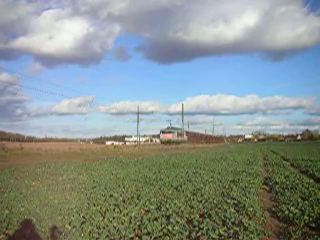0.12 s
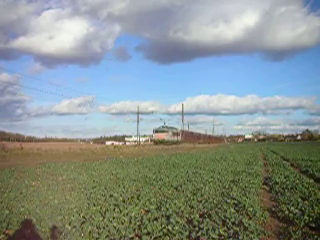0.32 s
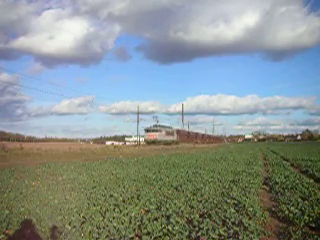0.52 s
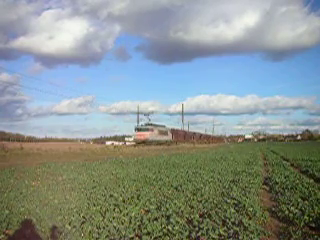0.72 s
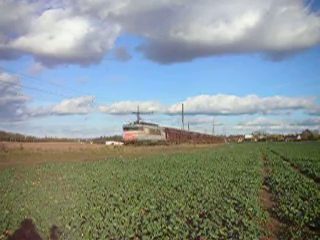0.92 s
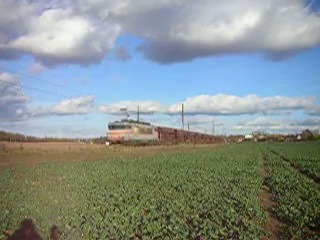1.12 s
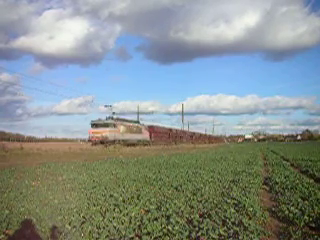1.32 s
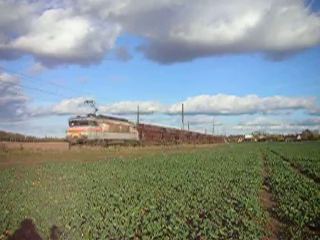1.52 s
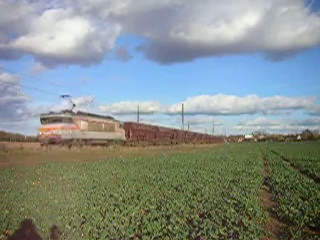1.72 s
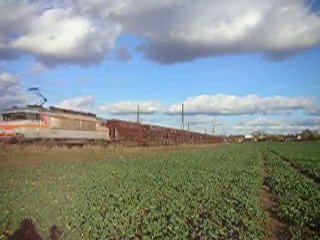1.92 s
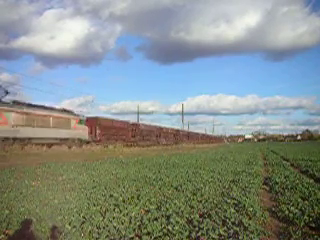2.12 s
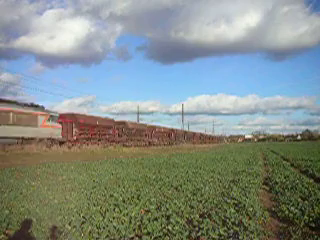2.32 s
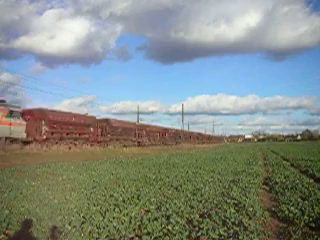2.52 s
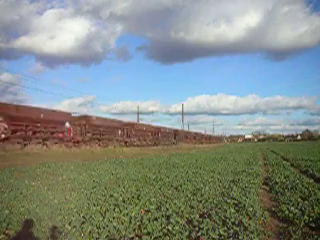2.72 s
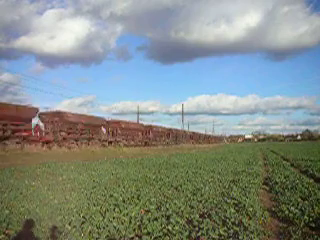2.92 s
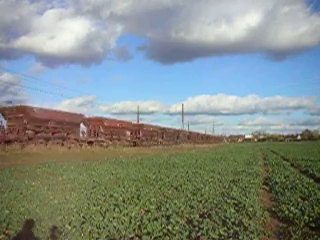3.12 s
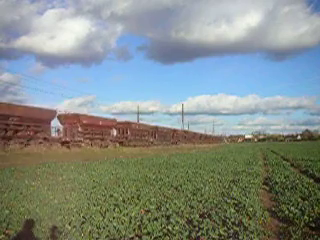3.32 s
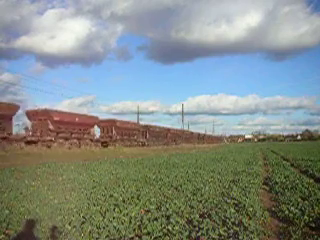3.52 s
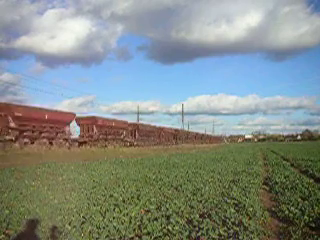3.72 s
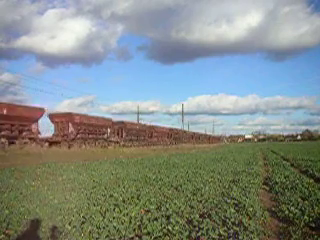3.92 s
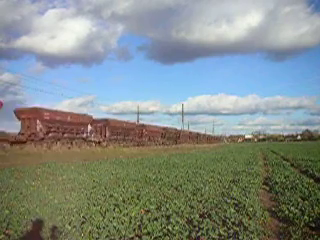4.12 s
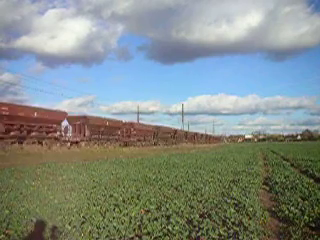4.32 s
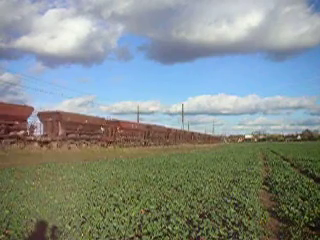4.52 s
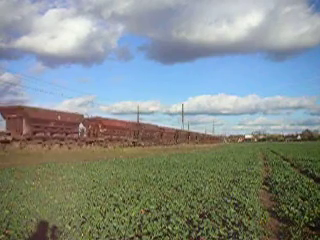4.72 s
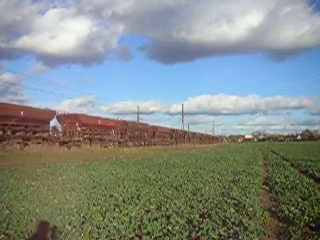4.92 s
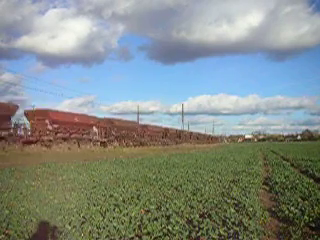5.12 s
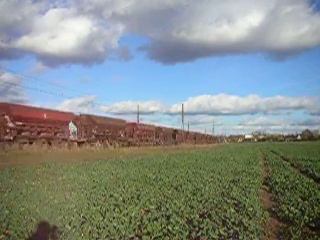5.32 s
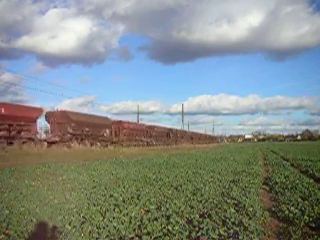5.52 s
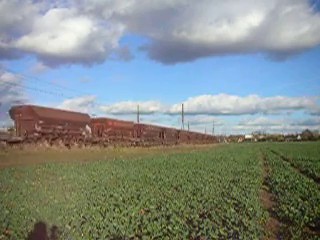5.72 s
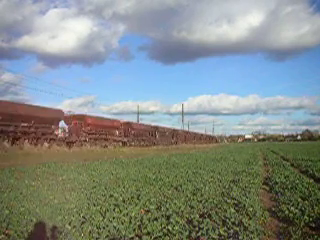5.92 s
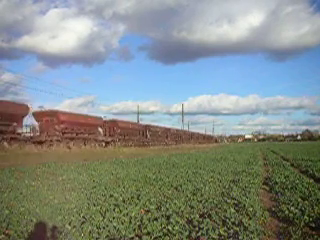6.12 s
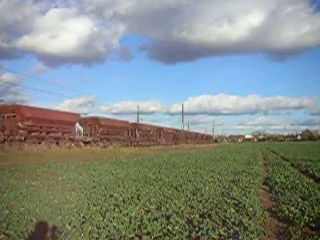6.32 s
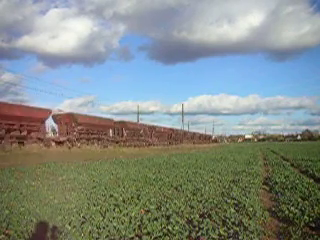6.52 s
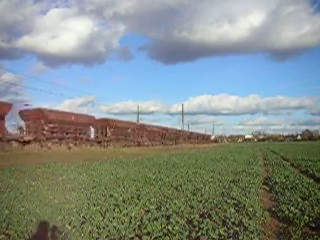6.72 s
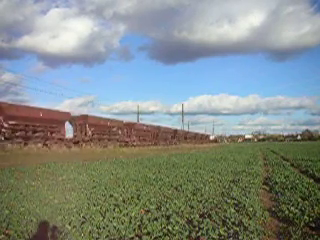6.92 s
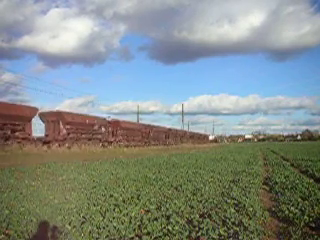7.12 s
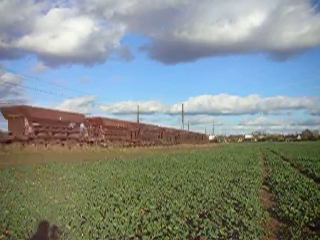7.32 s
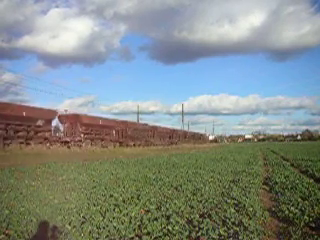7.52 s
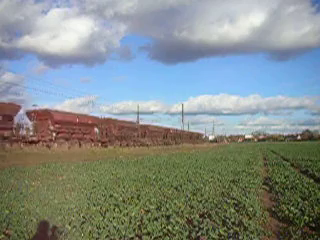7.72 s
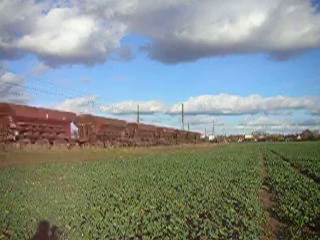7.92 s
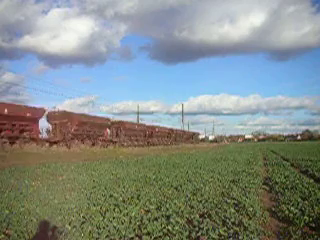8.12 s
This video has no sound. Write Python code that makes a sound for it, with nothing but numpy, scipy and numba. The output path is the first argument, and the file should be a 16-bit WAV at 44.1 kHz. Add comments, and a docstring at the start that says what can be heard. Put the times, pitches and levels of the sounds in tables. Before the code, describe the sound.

A small, cheap microphone about eighteen metres from the track catches a fast electric freight train outdoors. Fluttering wind gusts break up the approach, while blower and motor whines grow beneath them. Around three seconds the locomotive passes and its tones slide down. A dense, continuous wagon roar follows, mixing low body rumble, midrange rail noise, metallic wheel ringing and irregular jolts, with no clear treble and brief level dips.

```python
"""Electric freight train across a field

An open field, one small narrow-band microphone 18 m from the track, a faint breeze rumbling underneath.
An electric locomotive and a string of hopper wagons run past at 27 m/s: blower and drive whines sink in
pitch by Doppler shift, noise bands and ringing modes make the rails and wheels, wagon bodies rumble and knock.
Bursts of wind noise buffet the microphone as the train comes near; the recorder ducks after loud peaks."""
import sys
import numpy as np
from scipy import signal
from scipy.fft import rfft, irfft, next_fast_len
from scipy.io import wavfile
from scipy.ndimage import uniform_filter1d
from numba import njit

SR = 44100
rng = np.random.default_rng(int(sys.argv[2]) if len(sys.argv) > 2 else 0)


def wav_out(sig):
    """Save sig, one row per channel (or a flat mono array), as 16-bit PCM at SR to the path in sys.argv[1]."""
    wavfile.write(sys.argv[1], SR, np.round(np.clip(np.atleast_2d(sig).T, -1, 1) * 32767).astype(np.int16))


N = 365588
TIME = np.arange(N) / SR  # s
FREQ = np.fft.rfftfreq(N, 1 / SR)  # Hz

TRAIN_SPEED, TRACK_DISTANCE, SOUND_SPEED = 27., 18., 343  # m/s, m, m/s
LOCO_ABREAST_S = 3.240
THROB_PERIOD_S, THROB_PEAK_S = .392, 5.23


def undb(db):
    """Decibels to gain."""
    return 10 ** (np.asarray(db) / 20)


def curve(rows, axis=1):
    """One column of a table, joined by straight lines in time."""
    rows = np.asarray(rows)
    return np.interp(TIME, rows[:, 0], rows[:, axis])


def unit(x):
    """Scale to rms 1."""
    return x / np.sqrt(np.mean(x ** 2))


def noise(gain):
    """Noise of rms 1, shaped by the given gain at each frequency."""
    size = next_fast_len(N, True)
    shape = np.interp(np.fft.rfftfreq(size, 1 / SR), FREQ, gain)
    spectrum = rfft(rng.standard_normal(size)) * shape
    return unit(irfft(spectrum, size)[:N])


def colour(points):
    """Gain of a (f/Hz, level/dB) spectrum, falling away beyond its ends."""
    hz, db = np.transpose(points)
    low_end = np.minimum(FREQ / hz[0], 1)
    high_end = np.maximum(FREQ / hz[-1], 1) ** 4
    return undb(np.interp(np.log(FREQ + 1), np.log(hz), db)) * low_end / high_end


def resonances(modes):
    """Summed gain of (f/Hz, width/Hz, level/dB) resonances, each 6 dB down one width from its centre."""
    return sum(undb(db) / (1 + ((FREQ - hz) / width) ** 2) for hz, width, db in modes)


def walk(rate):
    """Smooth random wander of rms 1; rate is in fresh random steps per second."""
    k = max(int(SR / rate), 2)
    steps = np.repeat(rng.standard_normal(N // k + 1), k)
    smooth = uniform_filter1d(uniform_filter1d(steps, k), k)
    return unit(smooth[:N])


def steadied(x, window_s):
    """Even out the swells of a noise over a short window."""
    power = uniform_filter1d(x ** 2, max(int(window_s * SR), 2))
    return x / np.sqrt(np.abs(power) + 1e-9)  # rounding can leave tiny negative power


def passing(abreast_s):
    """Approximate emission time (its slope is the Doppler shift) and 1 / r gain, 1 when abreast."""
    distance = np.hypot(TRACK_DISTANCE, TRAIN_SPEED * (TIME - abreast_s))
    emitted = TIME - (distance - TRACK_DISTANCE) / SOUND_SPEED
    return emitted, TRACK_DISTANCE / distance


def breeze(level_db=-43):
    """A steady breeze leaves a faint low rumble under everything."""
    rumble = noise(colour([(30, -21.0), (60, -6), (120, 1.5), (200, -5.5), (400, -23.5), (1000, -44)]))
    return rumble * undb(level_db + 1.2 * walk(4.4))


# wind eddies on the microphone: t/s, length/s, level/dB (relative)
WIND_GUSTS = [(0.585, 0.036, -22.5), (0.634, 0.018, -23), (0.677, 0.012, -9.5), (0.69, 0.035, -5.5),
              (0.723, 0.024, -13), (0.798, 0.028, -11), (0.862, 0.04, -15.5), (0.914, 0.023, -15),
              (1.012, 0.077, -14), (1.107, 0.014, -13.5), (1.145, 0.082, -13.5), (1.259, 0.024, -21),
              (1.432, 0.045, -13), (1.542, 0.062, -15), (1.652, 0.011, -11), (1.685, 0.0095, -16.5),
              (1.752, 0.03, -13.5), (1.801, 0.067, -14.0), (1.858, 0.12, -18), (2.035, 0.17, -16.5),
              (2.205, 0.1, -13), (2.319, 0.083, -17.5), (2.423, 0.19, -17.5)]
# wind noise at the microphone port: f/Hz, level/dB (relative, per Hz)
PORT_WIND_COLOUR = [(30, -37.5), (70, -29.5), (130, -12), (220, -4), (310, 1.5), (430, -4.5), (600, -8.5),
                    (850, -29.5), (1400, -38.5), (3000, -63)]
# resonances of the overloaded diaphragm: f/Hz, width/Hz, level/dB (relative)
DIAPHRAGM_MODES = [(493, 200, 2.5), (782, 44, -1)]


def wind(edge_s=0.0025, level_db=-0.3, overload_db=1):
    """Eddies hit the microphone port in abrupt, fluttering bursts; rasp grows with pressure squared."""
    pressure = np.zeros(N)
    for start_s, length_s, db in WIND_GUSTS:
        inside = (TIME >= start_s) & (TIME < start_s + length_s)
        pressure = np.maximum(pressure, undb(db + level_db) * inside)
    pressure = uniform_filter1d(pressure, max(int(edge_s * SR), 2))
    flutter = steadied(noise(colour(PORT_WIND_COLOUR)), window_s=.012) * undb(1.5 * walk(150))
    rasp = steadied(noise(resonances(DIAPHRAGM_MODES)), window_s=0.011)
    # the tiny capsule leaks away the slowest pressure changes
    leak = signal.butter(2, 90, "high", fs=SR, output="sos")
    buffeting = signal.sosfilt(leak, pressure * flutter)
    return buffeting + undb(overload_db) * pressure ** 2 * rasp


# wagons jolting on the track: t/s, level/dB (relative)
WAGON_JOLTS = [(2.765, 1), (2.941, -7), (3.105, -1.5), (3.544, -3), (4.388, -7), (4.718, 1.5), (5.037, 3.5),
               (5.764, 1.5), (6.202, -6), (7.144, -2.5), (8.029, -3)]
# wagon frame modes: f/Hz, width/Hz, level/dB (relative)
WAGON_FRAME_MODES = [(210, 30, -2), (342, 51, 1), (480, 74, 6.5), (657, 140, -9.5)]


def knocks(rise_s=0.0055, decay_s=0.027, level_db=-10, low_cut_hz=140):
    """Jolts shake the wagon frames, whose noisy modes rattle out quickly."""
    force = np.zeros(N)
    for jolt_s, db in WAGON_JOLTS:
        age = np.maximum(TIME - jolt_s, 0)
        force += undb(db + level_db) * (1 - np.exp(-age / rise_s)) * np.exp(-age / decay_s)
    low_cut = np.minimum(FREQ / low_cut_hz, 1) ** 2
    frames = noise(resonances(WAGON_FRAME_MODES) * low_cut)
    return force * steadied(frames, window_s=0.011)


# blower tone: t/s, level/dB
BLOWER_LEVEL = [(0, -40), (.8, -32), (2.35, -29.5), (2.56, -21.5), (3.14, -16), (3.26, -27.5), (3.5, -21),
                (4.22, -22), (4.8, -45)]


def blower(rest_hz=501, octave_db=-17):
    """The cooling blower's blade tone and its octave, Doppler shifted."""
    emitted, nearness = passing(LOCO_ABREAST_S)
    # the air dragged along by the train makes the tone waver, most when it is close
    waver = nearness * (.55 * walk(20) + .35 * walk(70))  # rad
    blades = 2 * np.pi * rest_hz * emitted + waver
    tone = np.sqrt(2) * (np.sin(blades) + undb(octave_db) * np.sin(2 * blades))
    return tone * undb(curve(BLOWER_LEVEL) + 1.7 * walk(24))


# motor, gear and axle whines: f/Hz at rest, width/Hz, peak level/dB, abreast t/s, loudest t/s,
# fade/(dB per s) either side of the loudest time
DRIVE_WHINES = [(270, 16, -21, 3.24, 2.48, 70), (625, 9, -24, 3.9, 2.8, 10),
                (731, 12, -27.5, 3.24, 2.1, 15), (1002, 12, -27.5, 3.24, 3.15, 9),
                (1050, 70, -26, 3.24, 1.7, 10), (1105, 10, -34, 3.24, .9, 5),
                (1088, 10, -24.5, 3.24, 2.2, 16), (1338, 50, -32.5, 3.24, 1.65, 14),
                (1342, 18, -23, 3.24, 2.07, 100), (1985, 90, -41, 3.24, .6, 3),
                (2510, 40, -36, 3.24, 2.1, 6)]


def drive_whines():
    """Motors, gears and axles give narrow noisy whines, Doppler shifted."""
    out = 0
    for hz, width, db, abreast_s, loudest_s, fade_db in DRIVE_WHINES:
        emitted, _ = passing(abreast_s)
        phase = 2 * np.pi * hz * emitted
        # slow random amplitudes on sine and cosine broaden the line
        whine = walk(2 * width) * np.sin(phase) + walk(2 * width) * np.cos(phase)
        level_db = db - fade_db * np.abs(TIME - loudest_s)
        out = out + steadied(whine, window_s=0.28) * undb(level_db)
    return out


# wheel disc modes at rest: f/Hz, width/Hz, level/dB (relative)
DISC_MODES = [(902, 30, -4.5), (1358, 56, -4.5), (1824, 98, 0), (2471, 59, -1.5), (2794, 69, -3.5),
              (3074, 90, -3.5), (3360, 89, -6.5)]


def wheel_rings(count=18, spread=.025, beam=3.1):
    """Successive groups of wheels ring at slightly different pitches, beamed sideways, sinking as they pass."""
    ring, out = noise(resonances(DISC_MODES)), 0
    for k, (start, size) in enumerate(rng.random((count, 2))):
        emitted, nearness = passing(LOCO_ABREAST_S + k * THROB_PERIOD_S)
        pitch = 1 + spread * (size - .5)
        place = emitted * SR * pitch + start * N  # reading point in the looped ring, samples
        out = out + nearness ** beam * np.interp(place % N, np.arange(N), ring)
    return steadied(out, window_s=0.2)


# rolling noise as the train nears and runs by: t/s, rail level/dB (relative), wheel level above it/dB
ROLLING_LEVEL = [(0, -33.5, -3.5), (.28, -30.5, -4), (.42, -29.5, 0), (.9, -29, -.5), (1.5, -22, -7.5),
                 (1.85, -24.5, -4), (2.03, -19.5, -7), (2.55, -21, -1.5), (3.3, -18.5, -3),
                 (4.1, -17.5, -1.9), (4.9, -18, 1), (5.9, -18, -.5), (6.5, -18, .5), (8.06, -19, -1.85),
                 (8.29, -25, -1)]
# wagon bodies: t/s, level/dB (relative)
BODY_LEVEL = [(0, -36), (.3, -36), (.6, -27.5), (1.6, -30), (2.1, -24), (3.1, -24), (3.35, -19.5),
              (4.1, -18), (5.8, -20.5), (6.5, -19.8), (8.05, -22), (8.29, -25.5)]
# brief swells of the roar, and dips where the recorder ducks: t/s, change of level/dB
SWELLS_AND_DIPS = [(1.73, -5), (2.91, 5), (3.01, -1.5), (3.84, 3), (4.11, 1.5), (4.21, -3), (5.04, -1.5),
                   (5.33, -1), (6.83, -3), (7.07, -0.5), (7.8, -2)]
# radiated spectra of bodies, rails and wheels: f/Hz, level/dB (relative, per Hz)
BODY_SPECTRUM = [(25, -33.5), (50, -25.5), (80, -14), (120, -6), (170, -2), (300, 0), (430, -4),
                 (600, -6.5), (1000, -28), (2000, -50)]
RAIL_SPECTRUM = [(200, -27), (380, -2.5), (500, 3.5), (620, 0), (760, 1.5), (950, 0), (1120, -1),
                 (1350, -1), (1650, -3.5), (2100, -10.5), (3500, -43.5)]
WHEEL_SPECTRUM = [(900, -24.5), (1500, -8), (1850, 1), (2200, -1.5), (2550, 1.5), (2800, -1.5), (3150, -4),
                  (3500, -8), (3800, -14), (4200, -27.5), (4500, -50)]


def rolling(flutter_db=.5, lurch_db=1.55, swell_s=0.035, throb_roll_db=0.07, throb_rumble_db=0.05):
    """Rough treads shake rails, wheels and wagon bodies, which share one fluttering level."""
    # a very slight regular throb of the passing train
    throb = np.cos(2 * np.pi * (TIME - THROB_PEAK_S) / THROB_PERIOD_S)
    swells_and_dips = sum(db * np.exp(-((TIME - s) / swell_s) ** 2) for s, db in SWELLS_AND_DIPS)
    shared_db = .55 * walk(28) + swells_and_dips
    rail_db = curve(ROLLING_LEVEL) + shared_db + throb_roll_db * throb + flutter_db * walk(12)
    wheel_db = rail_db + curve(ROLLING_LEVEL, axis=2)
    body_db = curve(BODY_LEVEL) + shared_db + throb_rumble_db * throb + lurch_db * walk(14)
    # the soft field soaks up some of the low-lying rails' sound during the approach
    ground_db = np.interp(TIME, [0, .6, 1.5, 2.2, 2.9], [0.0, -2.0, -2, -0.5, 0.5])
    rails = noise(colour(RAIL_SPECTRUM)) * undb(rail_db + ground_db + 0.73 * walk(40) + 2.0)
    # wheel discs ring out sideways: their modes rise to about half the wheel power with the wagons abreast
    share = np.interp(TIME, [2, 3.5, 4.6], [.05, .3, .52])
    discs = np.sqrt(1 - share) * noise(colour(WHEEL_SPECTRUM)) + np.sqrt(share) * wheel_rings()
    wheels = discs * undb(wheel_db + .5 * walk(50) + 0.87)
    bodies = steadied(noise(colour(BODY_SPECTRUM)), window_s=.12) * undb(body_db + 0.5 * walk(35))
    return rails + wheels + bodies


def scene():
    """Train and wind at one microphone in the open."""
    return (breeze() + wind() + knocks() + blower() + drive_whines() + rolling())[None]


@njit
def gain_control(x, ceiling, attack, release):
    """A peak over the ceiling turns the gain down for 5 ms; it then creeps back up."""
    out, gain, held = np.empty(len(x)), 1., 0.
    for i in range(len(x)):
        out[i] = gain * x[i]
        if abs(out[i]) > ceiling:
            held = SR / 200
        if held > 0:
            gain, held = gain * (1 - attack), held - 1
        else:
            gain += (1 - gain) * release
    return out


def record(dry, attack_s=0.031, release_s=0.055):
    """A narrow-band recorder that ducks after overloads and clips the highest peaks."""
    band = signal.ellip(10, .1, 90, 4380, fs=SR, output="sos")
    narrow = signal.sosfilt(band, dry[0])
    attack, release = 1 / (attack_s * SR), 1 / (release_s * SR)  # per sample
    ducked = gain_control(narrow, .66, attack, release)
    clipped = np.clip(ducked, -.73, .73)
    output_filter = signal.ellip(8, .2, 70, 15800, fs=SR, output="sos")
    return signal.sosfilt(output_filter, clipped)[None]


dry = scene()
out = record(dry)
wav_out(out)
```